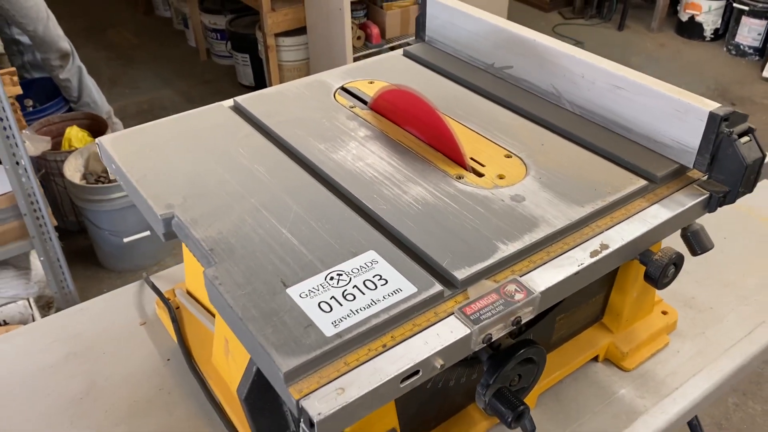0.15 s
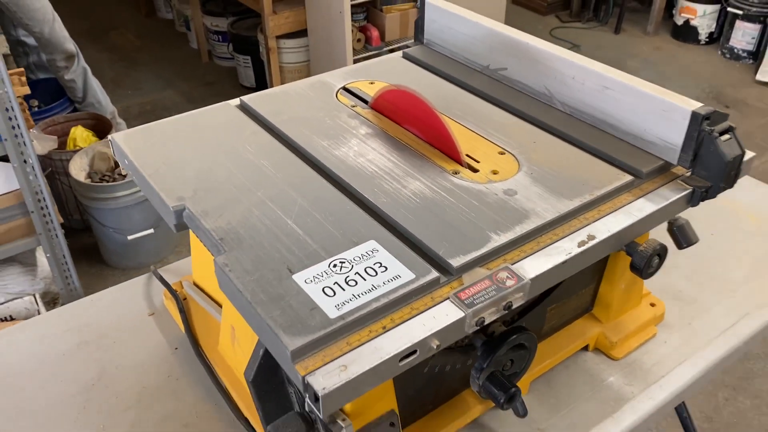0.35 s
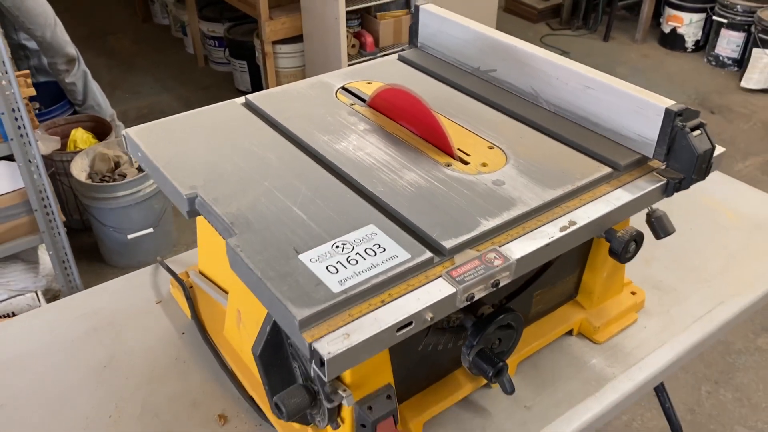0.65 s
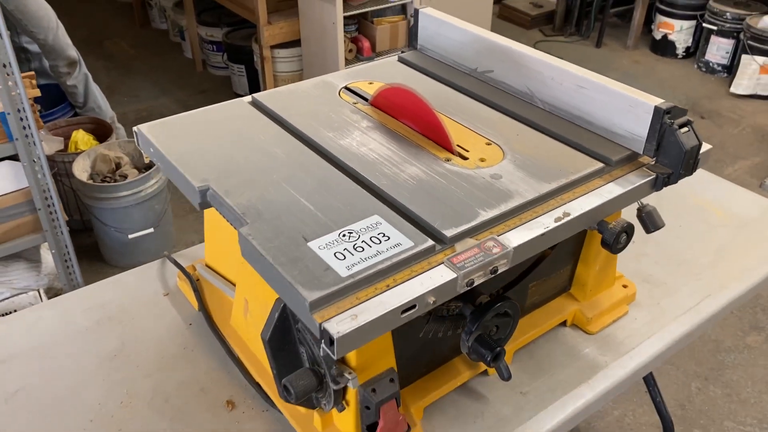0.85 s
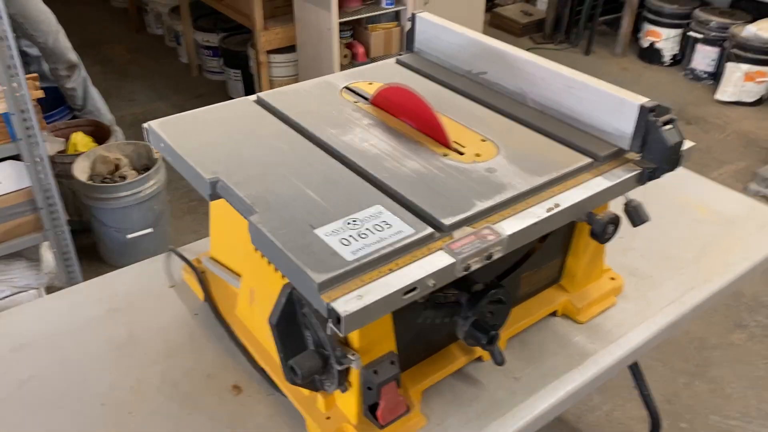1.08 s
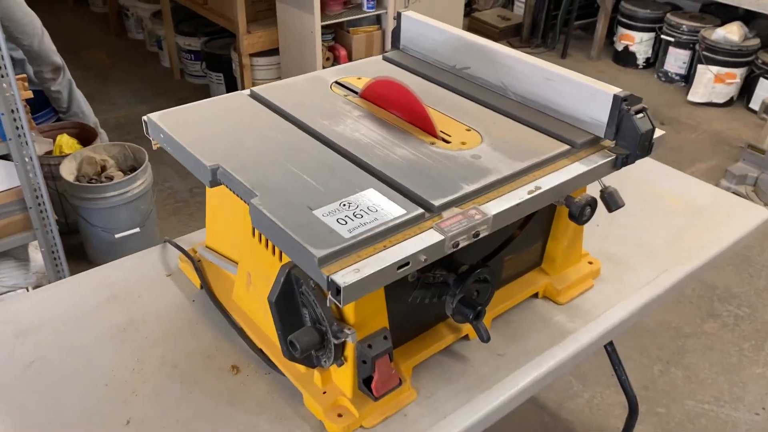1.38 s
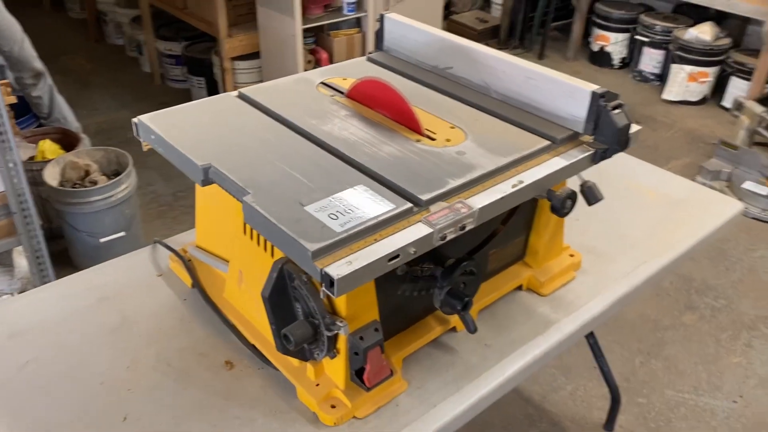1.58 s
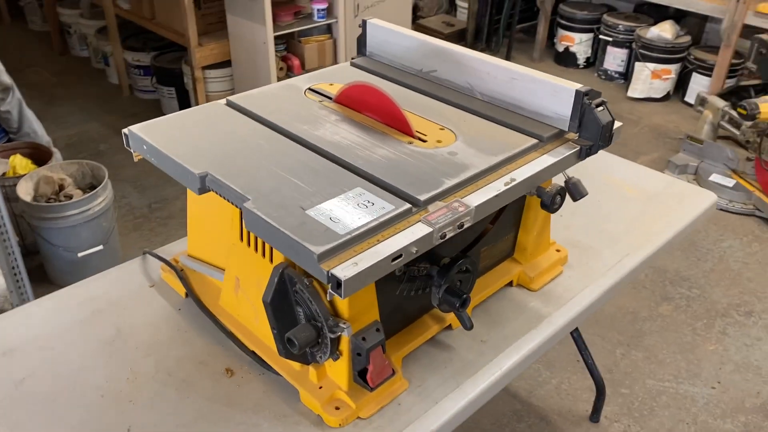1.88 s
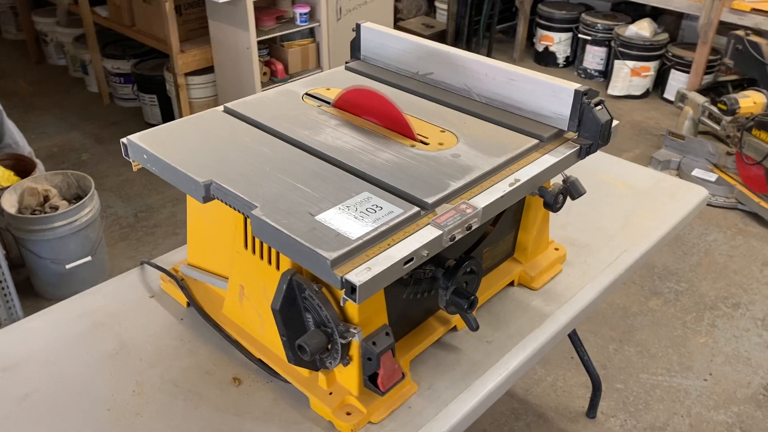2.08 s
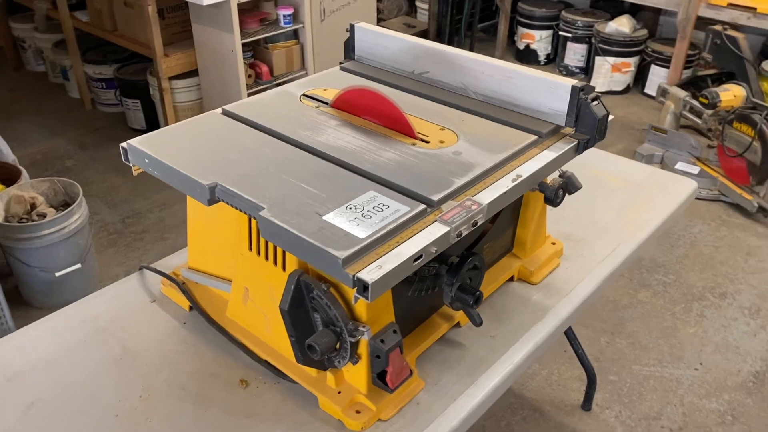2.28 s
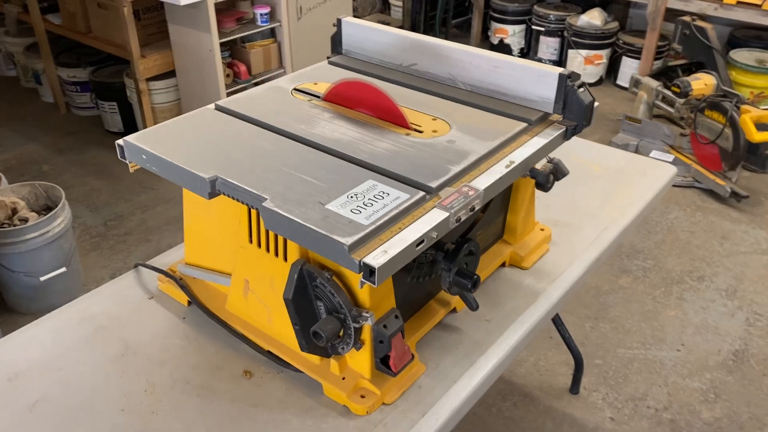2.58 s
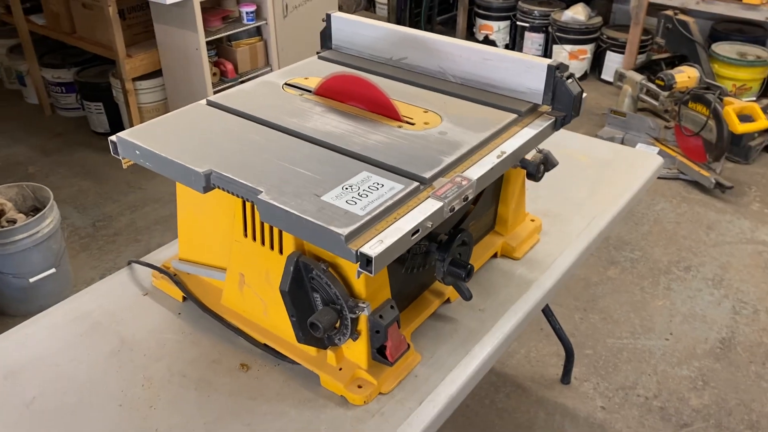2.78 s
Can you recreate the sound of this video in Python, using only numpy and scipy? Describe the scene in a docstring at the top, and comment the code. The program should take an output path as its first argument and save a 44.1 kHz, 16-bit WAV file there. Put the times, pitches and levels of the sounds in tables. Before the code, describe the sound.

A table saw spins down in a workshop, heard close with a short room tail. At 0 s a loud rush of air and coarse, pulsing growl surround a high gear whine. The whine slides down continuously, with a brief hum and metallic ringing around 0.6-1.1 s. Air fades strongly after 1.2 s; by 2-2.9 s a lower, rough whine, hiss and faint whistles remain, still slowing.

```python
"""A gear whine slides down in pitch amid rushing air, as a table saw coasts down in a workshop.
Friction and drag slow the motor; the whine and its tooth-error sidebands sweep past fixed resonances.
Shaped noise makes the rush of air from blade and fan, which dies away.
It leaves the hiss and whistle of brushes and bearings, over a low room drone made of one wavering tone."""
import sys
import numpy as np
from scipy import signal
from scipy.fft import rfft, irfft
from scipy.io import wavfile
from scipy.ndimage import uniform_filter1d

SR = 44100
rng = np.random.default_rng(int(sys.argv[2]) if len(sys.argv) > 2 else 0)


def to_wav(sig):
    """Store sig (one row per channel, or 1-D mono) as 16-bit WAV at the path in sys.argv[1].

    Samples outside -1..1 are clipped; the rate is SR.
    """
    pcm = np.clip(np.atleast_2d(sig), -1, 1) * 32767
    pcm = np.round(pcm).astype(np.int16)
    wavfile.write(sys.argv[1], SR, pcm.T)  # frames by channels


N = 129654  # length in samples

# Motor shaft: turns per second at the start, steady slowing by friction, extra slowing in step with speed
START_HZ, FRICTION_HZ_PER_S, DRAG_PER_S = 307, 39.5, .14
# The pinion sits on the motor shaft and drives the wheel that carries the blade
PINION_TEETH, WHEEL_TEETH = 10, 33


def undb(db):
    """Turn decibels into gain."""
    return 10 ** (np.asarray(db) / 20)


def unit(x):
    """Scale to an rms of 1."""
    return x / np.sqrt(np.mean(np.abs(x) ** 2))


def fader(rows):
    """Gain over time, joined through points of seconds and dB."""
    times, levels_db = np.array(rows).T
    return undb(np.interp(np.arange(N) / SR, times, levels_db))


def bins():
    """Frequencies of the spectrum in Hz, kept above zero."""
    return np.maximum(np.arange(N // 2 + 1) * SR / N, 1e-3)


def across(rows, axis=1):
    """One column of a table whose first column is Hz, joined on a log-frequency axis."""
    rows = np.array(rows)
    return np.interp(np.log(bins()), np.log(rows[:, 0]), rows[:, axis])


def noise(rows):
    """Steady noise with the given spectrum and no deep bass."""
    white = rfft(rng.standard_normal(N))
    bass_cut = 1 + (rows[0][0] / bins()) ** 6
    return unit(irfft(white * undb(across(rows)) / bass_cut, N))


def flutter(width_hz):
    """Slow complex noise: it turns a pure tone into a narrow band."""
    shape = 1 / (1 + (np.fft.fftfreq(N, 1 / SR) / width_hz) ** 2)
    return unit(np.fft.ifft(shape * np.exp(2j * np.pi * rng.random(N))))


def blade_angle(angle):
    """The gears turn the blade more slowly than the motor shaft."""
    return angle * PINION_TEETH / WHEEL_TEETH


def drone(t):
    """A low tone in the room, made unsteady by slow noise."""
    pitch_hz, width_hz, waver = 44, 4, .45
    # Level of the drone. Each row: time in seconds, level in dB
    drone_level = [(0, -47), (.08, -47), (.2, -68), (.5, -59), (.7, -52), (.92, -62), (1.25, -47.5),
                   (1.7, -51), (2.94, -50.5)]
    tone = np.exp(2j * np.pi * pitch_hz * t)
    wavering = np.real((1 + waver * flutter(width_hz)) * tone)
    return unit(wavering) * fader(drone_level)


def rush_and_hiss(angle):
    """Blade and fan tear the air; brushes and bearings hiss with a slight throb each shaft turn."""
    throb_depth, flicker_db, flicker_hz = .2, .6, 19
    # Spectrum of the air rush. Each row: frequency in Hz, relative strength per Hz in dB
    air_spectrum = [(60, -1), (130, -6.5), (220, -1.5), (380, 1), (620, 0.5), (1000, 0.5), (1550, -8),
                    (2100, -1.5), (2900, 3), (4200, -3), (5500, -10.5), (7500, -9.5), (10000, -8.5),
                    (15000, -37)]
    # Level of the air rush before the housing. Each row: time in seconds, level in dB
    rush_level = [(0, -29.5), (.6, -30), (.9, -32.5), (1.25, -34), (1.7, -38.5), (2.2, -42), (2.94, -53.5)]
    # Spectrum of the brush and bearing hiss. Each row: frequency in Hz, relative strength per Hz in dB
    brush_spectrum = [(60, 9), (130, 4), (300, 1), (600, -3), (1000, 1), (2000, -0.5), (3200, 2),
                      (4500, -5), (6000, 1), (8000, -4.5), (10000, -1), (12000, -14), (14000, -4.5),
                      (15500, -11)]
    # Level of the hiss before throb and housing. Each row: time in seconds, level in dB
    hiss_level = [(0, -37.5), (1, -39.5), (1.5, -37), (2.94, -37)]
    throb = 1 + throb_depth * np.sin(angle)
    flicker = undb(flicker_db * unit(flutter(flicker_hz).real))
    rush = noise(air_spectrum) * fader(rush_level)
    hiss = noise(brush_spectrum) * throb * flicker * fader(hiss_level)
    return rush + hiss


def growl(angle, t):
    """A coarse band from the fan pulses every few shaft turns and dies quickly as the speed falls."""
    centre_hz, width_hz, start_db, fall_db_per_s = 901, 116, -35, 19.5
    pulse_db, turns_per_pulse = 6, 6
    band = np.real(flutter(width_hz) * np.exp(2j * np.pi * centre_hz * t))
    pulsing = undb(pulse_db * np.sin(angle / turns_per_pulse))
    return unit(band * pulsing) * undb(start_db - fall_db_per_s * t)


def imbalance(angle):
    """Rotor and blade each hum once a turn, because neither is perfectly balanced."""
    # Motor shaft hum. Each row: time in seconds, level in dB
    shaft_level = [(0, -52.5), (.52, -51), (.6, -42.5), (.7, -31), (.76, -40), (.83, -48), (.95, -41.5),
                   (1.27, -44.5), (1.55, -49.5), (1.9, -58), (2.4, -53), (2.94, -54)]
    # Blade wobble. Each row: time in seconds, level in dB
    wobble_level = [(0, -46.5), (.35, -53), (.55, -69), (2.94, -66)]
    shaft_hum = unit(np.sin(angle)) * fader(shaft_level)
    blade_hum = unit(np.sin(blade_angle(angle))) * fader(wobble_level)
    return shaft_hum + blade_hum


def whistles(angle, t):
    """Hazy high tones follow the shaft speed, split by the blade's turn; each swells and fades."""
    haze_hz, flicker_db, flicker_hz, split_depth = 180, 4, 30, .9
    # Bearing and commutator whistles. Each row: pitch as a multiple of the shaft speed, level in dB,
    # haze in dB against the plain tone, moment of greatest loudness in seconds, spread of the swell in seconds
    whistle_rows = [(15.9, -43, 2, .35, .08), (32, -46.5, -7, 2.83, .12), (32, -51, -4, 2.3, .15),
                    (35.1, -44, 3, 1.25, .18), (35.1, -41.5, 0, 1.99, .11), (45.1, -45.5, 5, 1.24, .17),
                    (45.1, -45, 2, 1.98, .13), (45.1, -48.5, 1, 2.58, .21), (35.1, -52, -1, 2.48, .1),
                    (85.1, -52, 5, 2.0, .06)]
    wheel = blade_angle(angle)
    out = 0
    for multiple, db, haze_db, loudest_s, spread_s in whistle_rows:
        strands = 1 + split_depth * np.sin(wheel + 2 * np.pi * rng.random())
        haze = undb(haze_db) * flutter(haze_hz)
        line = np.real((strands + haze) * np.exp(1j * multiple * angle))
        # tanh keeps the flicker within its limit in dB
        flicker = undb(flicker_db * np.tanh(unit(flutter(flicker_hz).real)))
        swell = np.exp(-((t - loudest_s) / spread_s) ** 2 / 2)
        out = out + unit(line * flicker) * undb(db) * swell
    return out


def blade(mesh):
    """The steel disc rings at one pitch, shaken by whichever gear sidebands lie near it."""
    ring_hz, width_hz = 2440, 85
    # Ringing, strong as the gear tone or its octave sweeps past. Each row: time in seconds, level in dB
    blade_level = [(0, -69), (.5, -69), (.62, -33), (.8, -42.5), (1.04, -40), (1.2, -51.5), (2.3, -76),
                   (2.52, -51), (2.7, -47.5), (2.94, -55)]
    f = bins()
    resonance = 1 / (1 + 1j * (f * f - ring_hz ** 2) / (f * width_hz)) ** 2
    tone = irfft(rfft(mesh) * resonance, N)
    # Even out the loudness so that the table sets the level
    loudness = np.sqrt(uniform_filter1d(tone ** 2, size=SR // 16) + 1e-14)
    return tone / loudness * fader(blade_level)


def tooth_errors(wheel, count=6):
    """Uneven teeth repeat with each blade turn and add sidebands on both sides of the gear tone."""
    sideband_db, fall_db_per_step = -10, 1.5
    out = 0
    for k in range(-count, count + 1):
        if k:
            gain = undb(sideband_db - fall_db_per_step * abs(k))
            out = out + gain * np.exp(1j * (k * wheel + 2 * np.pi * rng.random()))
    return out


def gear_beat(angle, t):
    """At speed, loose teeth beat every second blade turn; the pinion adds a beat each shaft turn."""
    wander, wander_hz = .4, 3.6  # unsteady timing of the loose teeth: radians rms, width in Hz
    # Depth of the beats. Each row: time in seconds, every-second-blade-turn swing in dB,
    # every-pinion-turn swing as a share of the level
    beat_depths = [(0, 10, .3), (.62, 10, .3), (.8, 3.5, .3), (1.03, 6, .3), (1.45, 1, .6), (2.1, 1, .7),
                   (2.4, 1.5, 1), (2.94, 1.5, .8)]
    times, backlash_db, runout = np.array(beat_depths).T
    timing = blade_angle(angle) / 2 + wander * unit(flutter(wander_hz).real)
    backlash = undb(np.interp(t, times, backlash_db) * np.sin(timing))
    beat = backlash * (1 + np.interp(t, times, runout) * np.sin(angle))
    # Even out the beats over a fifth of a second so that they leave the longer-term level alone
    return beat / np.sqrt(uniform_filter1d(beat ** 2, size=SR // 5))


def gears(angle, t):
    """Meeting teeth whine at the tooth rate, with overtones, sidebands, roughness and beats."""
    rough_db, rough_hz = -7, 130
    # Overtones of the gear mesh. Each row: multiple of the tooth rate,
    # strength in dB before its steady part is divided by the multiple
    overtones = [(1, -2), (2, -7), (3, -14)]
    # Gear whine before the gearcase. Each row: time in seconds, level in dB
    gear_level = [(0, -45), (.2, -39.5), (.5, -40.5), (.65, -40.5), (.83, -33), (1.03, -40), (1.15, -48.5),
                  (1.42, -44.5), (2.4, -43), (2.94, -44)]
    out = 0
    for multiple, db in overtones:
        roughness = undb(rough_db) * flutter(rough_hz)
        swell = 1 / multiple + tooth_errors(blade_angle(angle)) + roughness
        tone = np.exp(1j * round(multiple) * PINION_TEETH * angle)
        out = out + undb(db) * np.real(swell * tone)
    return unit(out * gear_beat(angle, t)) * fader(gear_level)


def ring(x, modes):
    """A wall passes the sound and rings at its own fixed pitches."""
    f = bins()
    response = 1
    for hz, width, db in modes:
        response = response + undb(db) / (1 + 1j * (f * f - hz * hz) / (f * width))
    return irfft(rfft(x) * response, N) * undb(-3.0)


def workshop(x, t):
    """Two microphone ports hear the sound directly, each with a short diffuse room tail."""
    room_t60_s = .25  # time for the room tail to fall by 60 dB
    # Sound at the ports. Each row: frequency in Hz, left-over-right level in dB,
    # left's lead in radians, room level in dB
    port_rows = [(60, -.2, 0, -9), (300, 0, 0, -14), (700, 3.6, .3, -9), (1000, 3.5, .6, -3),
                 (1300, 6, .7, -2), (1620, 6, -.1, -3), (1850, 2.5, -.4, -4.5), (2900, 1.8, .8, -4),
                 (5500, 1.4, .3, 1), (9000, 0, 2, -6), (14000, 0, 1.2, -7)]
    balance_db, phase = across(port_rows, axis=1), across(port_rows, axis=2)
    wet = undb(across(port_rows, axis=3))
    bass_cut = bins() / np.hypot(bins(), 200)
    out = []
    for side in (1, -1):  # left, right
        tail = rng.standard_normal(N) * undb(-60 * t / room_t60_s) * (t > .003)
        arriving = rfft(x) * undb(side * balance_db / 2)
        direct = irfft(arriving * np.exp(1j * side * phase / 2), N)
        feed = irfft(arriving * wet * bass_cut, N)
        # A mirrored lead-in lets the room sound from the first moment
        led_in = np.r_[feed[::-1], feed]
        room = signal.fftconvolve(led_in, tail / np.linalg.norm(tail))[N:2 * N]
        out.append(direct + room)
    return np.array(out)


def scene():
    """Dry friction and drag slow the shaft, whose angle drives the turning sounds."""
    # Housing resonances. Each row: frequency in Hz, width in Hz, peak in dB against the plain wall
    housing_modes = [(219, 12.4, 4), (441, 40, 1.5), (788, 14.5, 0.5), (969.6, 34, 2), (1174, 66, 1.5),
                     (3810, 86, -5.5), (4420, 98, -8.5), (5200, 230, -11), (5620, 85, -17.5),
                     (9610, 185, -0.5), (13700, 560, 0.5)]
    # Gearcase and blade resonances. Each row: frequency in Hz, width in Hz, peak in dB against the plain wall
    gearcase_modes = [(1248, 50, 3.5), (1382, 99, 1.5), (1621, 58, 15), (1857, 29, 14.5), (2350, 110, -3),
                      (2560, 110, -2), (2800, 210, -1)]
    t = np.arange(N) / SR
    offset_hz = FRICTION_HZ_PER_S / DRAG_PER_S
    shaft_hz = (START_HZ + offset_hz) * np.exp(-DRAG_PER_S * t) - offset_hz
    angle = 2 * np.pi * np.cumsum(shaft_hz) / SR
    air = ring(rush_and_hiss(angle) + growl(angle, t), housing_modes)
    mesh = gears(angle, t)
    whine = ring(mesh, gearcase_modes) + blade(mesh)
    tones = whine + whistles(angle, t) + imbalance(angle)
    return workshop(drone(t) + air + tones, t)


def record(dry):
    """The recorder steeply cuts the highest treble."""
    top_hz = 15300
    low_pass = signal.ellip(10, .1, 80, top_hz, fs=SR, output="sos")
    return signal.sosfilt(low_pass, dry)


dry = scene()
out = record(dry)
to_wav(out)
```